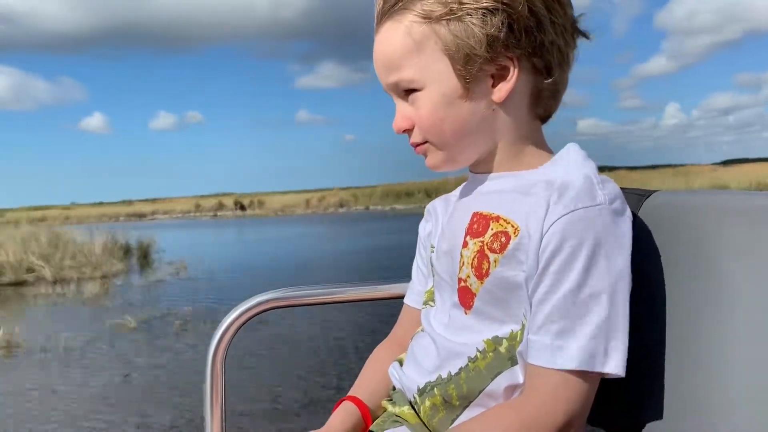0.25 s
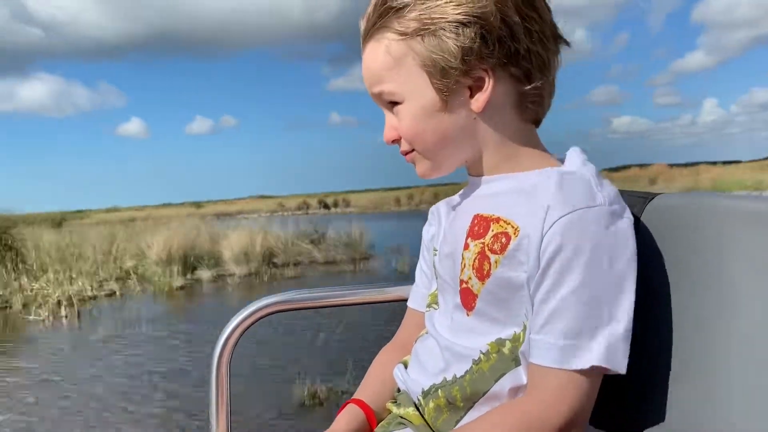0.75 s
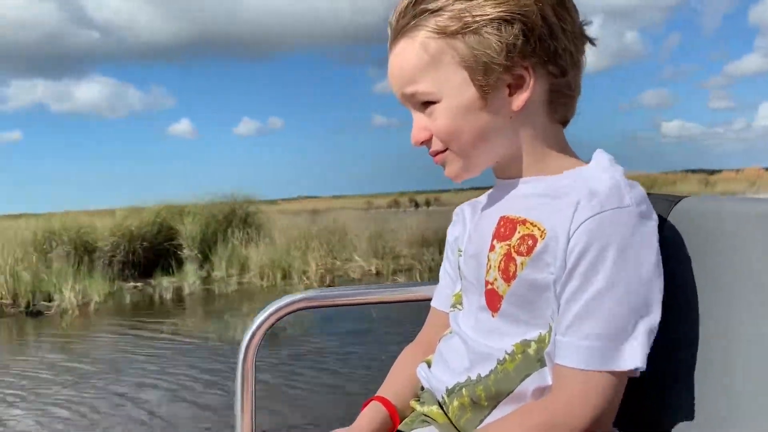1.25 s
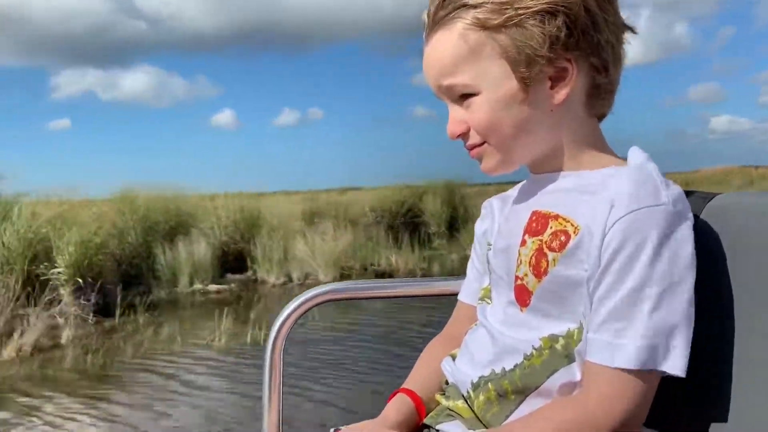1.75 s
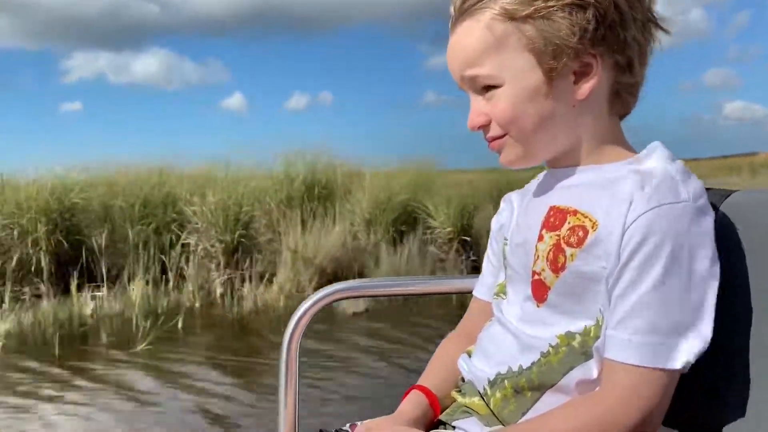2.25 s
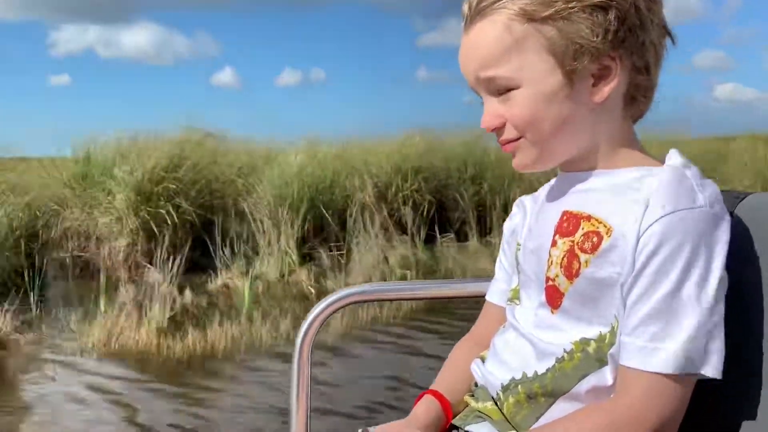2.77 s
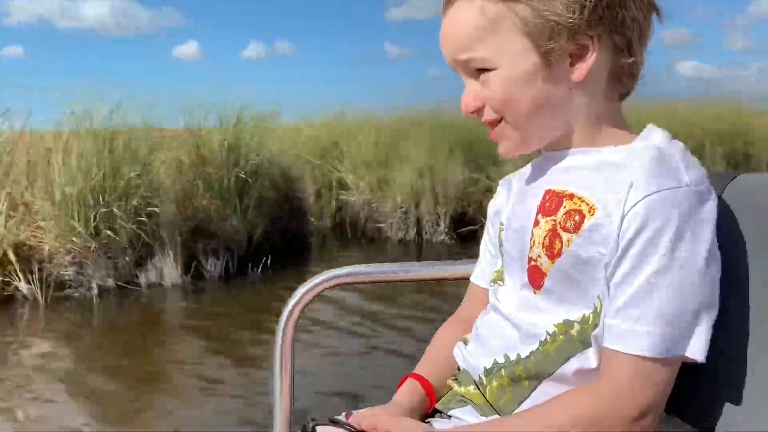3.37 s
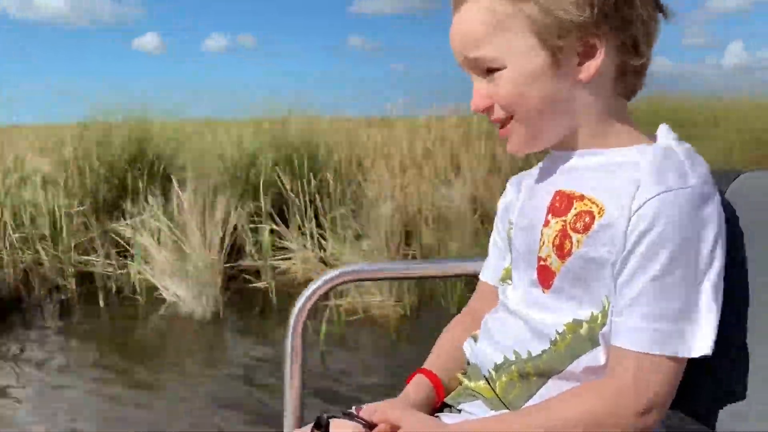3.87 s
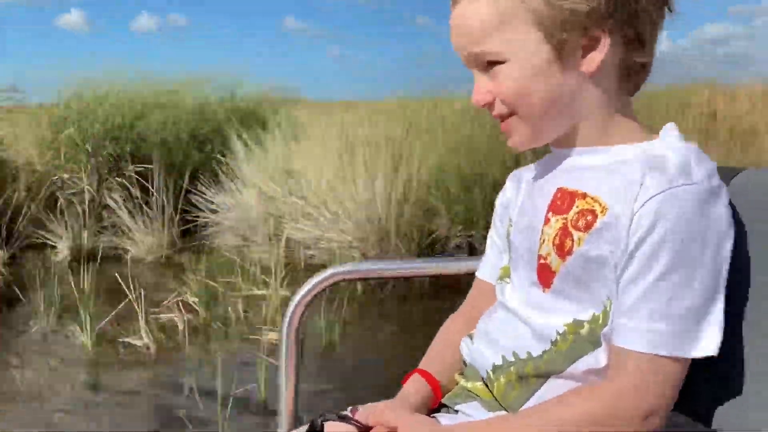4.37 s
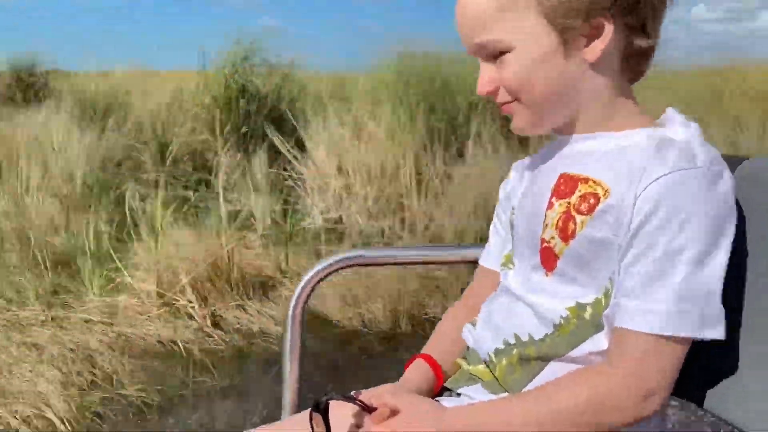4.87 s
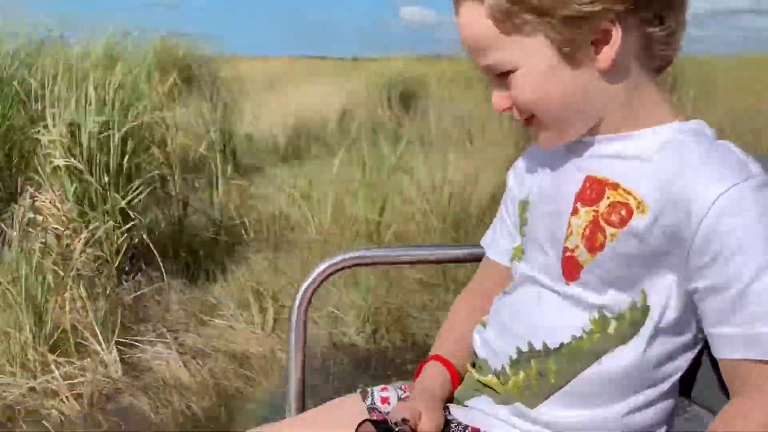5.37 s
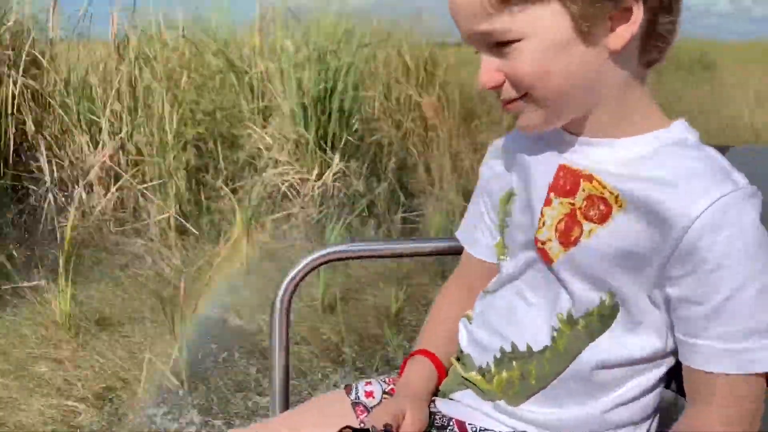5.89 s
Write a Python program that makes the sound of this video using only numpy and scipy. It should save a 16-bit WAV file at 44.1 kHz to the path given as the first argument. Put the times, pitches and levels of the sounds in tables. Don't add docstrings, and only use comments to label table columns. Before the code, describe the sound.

A close stereo pair at the seats of an airboat on open marsh hears an unbroken loud drone from start to finish. Just behind, the propeller holds a deep pair of tones near 92 and 185 Hz, with weaker, fluttering overtones. Engine exhaust adds rough low tones that beat with the blades, and a very thin gear whine lies underneath. Broadband wash, fine hiss and low wind rumble fill the rest. Pitch creeps up until about 1.8 s, then slowly sinks slightly to the end at 6.1 s. Wind gusts swell around 0.5, 1.35, 2.3, 4.8 and 5.8 s. The guard hums in brief bursts, stronger near 3.65, 5.84 and 6.06 s. Overtone colour shifts through the bend until about 4.2 s. Nearby reeds thicken the wash around 1.6 s and after 5 s, with slightly more hiss at the end and a tiny whine jump near 6.07 s.

```python
import sys
import numpy as np
from scipy import signal
from scipy.fft import rfft, irfft
from scipy.io import wavfile

SR = 44100
rng = np.random.default_rng(int(sys.argv[2]) if len(sys.argv) > 2 else 0)


def transcribe(signal):
    frames = np.atleast_2d(signal).T
    limited = np.clip(frames, -1, 1)
    pcm = np.round(limited * 32767).astype(np.int16)
    wavfile.write(sys.argv[1], SR, pcm)


def nominal_scale(level):
    x = np.asarray(level, float) / 20
    return 10 ** x


N = 270333

# (time [s], blade passes [per s])
SPEED = [
    (0.0, 92.3),
    (0.6, 92.58),
    (1.8, 93.0),
    (3.0, 92.75),
    (4.2, 92.12),
    (5.0, 91.64),
    (6.13, 90.62),
]


def blade_passes():
    return np.cumsum(in_time(SPEED)[0]) / SR


# (multiple [1], level [dB], left over right [dB], left lead [rad], steady share [0-1])
BLADES = [(1, -20.9, -1.5, -0.3, 1.0), (2, -22.2, 0.4, -0.1, 0.98), (3, -41.8, -4.4, 0.6, 0.65),
          (4, -43.3, -5.2, -1.4, 0.6), (5, -43.2, 1.4, 2.4, 0.65), (6, -46.2, 6.2, -2.9, 0.6),
          (7, -54.5, 2.7, 0.9, 0.38), (8, -49.6, -1.8, -1.5, 0.7), (9, -52.3, 2.9, -1.0, 0.54),
          (10, -51.4, 0.4, -2.5, 0.6), (11, -53.0, 3.2, -2.9, 0.55), (12, -58.8, -5.1, -1.5, 0.34),
          (13, -54.3, -0.3, -2.4, 0.66), (14, -56.5, 0.7, 3.0, 0.36), (15, -59.0, -0.5, -3.1, 0.2),
          (16, -61.4, -0.1, 2.7, 0.23), (17, -61.0, -0.1, 1.5, 0.45)]
# (time [s], share of the swing [0-1])
HEADING = [
    (0, 0.14),
    (2.4, 0.45),
    (4.2, 0.98),
    (5.3, .95),
    (6.13, 0.8),
]
# (multiple [1], change over the whole swing [dB])
LOBES = [
    (3, -9.0),
    (5, 6.0),
    (7, 8.0),
    (8, -5.0),
    (13, -4.0),
]


def propeller(passes, reeds, load_db):
    passes = passes + 0.0026 * drift(4.6)
    swing = in_time(HEADING)[0] - 0.5
    eddy = nominal_scale(1.3 * drift(7.5))
    lowest_db = [0.54 - 1.7 * reeds, load_db]
    low_db = -1.6 - 1.8 * load_db
    high_db = -1.1 + 1.5 * reeds - 0.97 * load_db
    lobes = dict(LOBES)
    out = 0
    for k, level_db, lean_db, lead, steady in BLADES:
        skew = -1.8 if k < 7 else 1.15
        turns = k * passes + skew * (k - 1) / (2 * np.pi)
        if k < 3:
            flutter_db = lowest_db[int(k) - 1] + 0.25 * drift(6.0)
            out = out + partial(turns, level_db + flutter_db, lean_db, lead, steady=1, waver_hz=1)
            continue
        line = partial(turns, level_db, lean_db, lead, np.sqrt(steady), waver_hz=0.65 + 0.16 * k)
        hump_db = level_db - 5.5 + 0.67 * min(k, 11)
        hump = partial(turns, hump_db, lean_db, lead, steady=0, waver_hz=9.2 + 1.0 * k)
        lift_db = (low_db if k < 7 else high_db) + lobes.get(k, 0) * swing + 2.0 * drift(2.5)
        out = out + nominal_scale(lift_db) * (line + eddy * hump)
    return out


def crank_turns(passes):
    return 0.76383 * passes + 1.082


# (crank order [1], level [dB], left over right [dB], left lead [rad])
EXHAUST = [(1.0, -38.5, -0.1, -0.2), (1.5, -36.7, -0.8, -0.4), (2.0, -51.5, 1.1, -0.2),
           (2.5, -35.5, 0.8, -0.4), (3.0, -48.4, 1.8, -0.4), (3.5, -45.2, 2.9, -0.2),
           (4.0, -45.1, 4.1, -0.7), (4.5, -50.1, -2.4, -1.8), (5.0, -45.1, -0.7, -2.9),
           (5.5, -50.7, 4.2, -1.0), (8.0, -53.1, -0.2, 0.6), (11.0, -60.5, -0.5, 0.3),
           (12.0, -58.0, -2.2, -1.4), (15.5, -58.8, 0.8, -2.2)]


def exhaust(crank):
    out = 0
    for order, level_db, lean_db, lead in EXHAUST:
        turns = order * crank + 0.013 * drift(12.0)
        steady = 1 - 0.0069 * order ** 2
        tone = partial(turns, level_db, lean_db, lead, steady, waver_hz=2.5)
        out = out + nominal_scale(0.93 * drift(4.4)) * tone
    return out


# (time [s], lift [dB], half length [s])
WHINE_JOLT = [
    (6.07, 10, 0.032),
]


def gear_whine(crank, load_db):
    warming_db = 1.2 * np.arange(N) / SR
    level_db = -69.5 + 2.5 * load_db + warming_db + bumps(WHINE_JOLT)
    teeth = 48
    return partial(teeth * crank, level_db, lean_db=2.5, lead=0.1, steady=0.9, waver_hz=3)


# (time [s], lift [dB])
CAGE_BURSTS = [
    (0.33, 5),
    (1.25, 3),
    (2.17, 6),
    (3.65, 7.5),
    (5.07, 6),
    (5.61, 2),
    (5.84, 7),
    (6.06, 9.5),
]


def cage(chop):
    pitch_hz, width_hz = 998, 140
    r = np.exp(-np.pi * width_hz / SR)
    poles = [1, -2 * r * np.cos(2 * np.pi * pitch_hz / SR), r * r]
    ring = rng.standard_normal((3, N))
    for _ in range(2):
        ring = signal.lfilter([1, 0, -1], poles, ring)
    hum = rms_one(ring[0] + 0.37 * ring[1:])
    burst_db = bumps([(s, db, 0.028) for s, db in CAGE_BURSTS])
    return hum * nominal_scale(-52 + burst_db + 2.8 * drift(15.0) + 6.5 * chop)


# (frequency [Hz], level per Hz [dB], left over right [dB], likeness [0-1])
WASH = [(152, 1, -5.5, 0.5), (288, -2.5, 8.5, 0.26), (460, -2.5, -0.5, 0.2), (656, -7.5, 0.5, 0.27),
        (1010, -10, -7, 0.19), (1250, -10, 3, 0.5), (1940, -9.5, -1, 0.49), (2920, -19.5, 4, 0.56),
        (4260, -24.5, 8, 0.23), (5470, -29, 4.5, 0.6), (7000, -38, 3, .2), (9800, -42, -14, .2)]


def propeller_wash(chop, reeds):
    air = air_noise(WASH, lag_s=11.8 / SR, turn=0.01, patchy_db=0.5, count=12)
    return air * nominal_scale(-38 + 1.05 * reeds + 0.4 * chop)


# (frequency [Hz], level per Hz [dB], left over right [dB], likeness [0-1])
HISS = [(3020, -1, -7, 1), (5470, -2, -2.5, 0.14), (7400, -0.5, 0, 0.54), (8900, -1, -2, .85),
        (11000, -2.5, 1, 0.84), (13000, -4, -1, 1), (14400, -1.5, 1.5, .6), (15940, -9, -2.5, .6)]


def slipstream_hiss(chop, reeds):
    air = air_noise(HISS, lag_s=11.15 / SR, turn=-2.1, patchy_db=0.3, count=5)
    return air * nominal_scale(-51.5 + 2.3 * reeds ** 3 + 0.2 * chop)


# (frequency [Hz], level per Hz [dB], left over right [dB], likeness [0-1])
RUMBLE = [(20, -24, 3, 1), (31.8, -3.5, 4, 0.7), (64.6, 3, -0.5, 1), (103, .5, 3, 0.97), (208, 0, -2, 1),
          (256, -1, -8.5, 0.56), (330, -8.5, -3, 0.28), (474, -34.5, -2.5, 1)]
# (time [s], lift [dB], half length [s])
GUSTS = [
    (.5, 5, .2),
    (1.35, 4, .15),
    (2.3, 6.5, .35),
    (4.8, 3.5, 0.26),
    (5.8, 6, 0.49),
]


def wind_rumble():
    air = air_noise(RUMBLE, lag_s=0.000084, turn=0.072, patchy_db=1.4, count=6)
    return air * nominal_scale(-38.5 + bumps(GUSTS))


def air_noise(rows, lag_s, turn, patchy_db, count):
    hz = np.maximum(np.arange(N // 2 + 1) * SR / N, 1)
    at, *columns = np.transpose(rows)
    level_db, lean_db, alike = [np.interp(np.log(hz), np.log(at), c) for c in columns]
    alike = np.clip(alike, 0, 1)
    shared, left, right = rfft(rng.standard_normal((3, N)))
    late = np.exp(-1j * (2 * np.pi * hz * lag_s + turn))
    common = shared * np.array([late, np.ones_like(late)])
    pair = np.sqrt(alike) * common + np.sqrt(1 - alike) * np.array([left, right])
    pair = pair * nominal_scale(level_db + np.outer([0.5, -0.5], lean_db))
    pair = pair * (hz > at[0]) * (hz < at[-1])
    place = np.interp(np.log(hz), np.log(at[[0, -1]]), [0, count - 1])
    together = drift(8.1)
    out = 0
    for k in range(count):
        band = np.clip(1 - np.abs(place - k), 0, 1)
        flicker_db = patchy_db * (0.81 * together + drift(11.0))
        out = out + irfft(pair * band, N) * nominal_scale(flicker_db)
    return rms_one(out)


def partial(turns, level_db, lean_db, lead, steady, waver_hz, alike=0.3):
    steady = np.clip(steady, 0, 1)
    scatter = 1 - steady ** 2
    both, *own = [(drift(waver_hz) + 1j * drift(waver_hz)) / np.sqrt(2) for _ in range(3)]
    shared = steady + np.sqrt(scatter * alike) * both
    spin = np.exp(2j * np.pi * turns)
    out = []
    for side, apart in zip((0.5, -0.5), own):
        shape = shared * np.exp(1j * side * lead) + np.sqrt(scatter * (1 - alike)) * apart
        out.append(np.sqrt(2) * nominal_scale(level_db + side * lean_db) * np.real(shape * spin))
    return np.array(out)


def drift(rate_hz):
    r = np.exp(-64 * np.pi * rate_hz / SR)
    noise = rng.standard_normal(N // 32 + 2002)
    slow = signal.lfilter([1], [1, -2 * r, r * r], noise)[2000:]
    return np.interp(np.arange(N) / 32, np.arange(len(slow)), rms_one(slow))


def bumps(rows):
    t = np.arange(N) / SR
    return sum(db * np.exp(-0.5 * ((t - s) / half) ** 2) for s, db, half in rows)


def in_time(rows):
    s, *columns = np.transpose(rows)
    return [np.interp(np.arange(N) / SR, s, c) for c in columns]


def rms_one(x):
    return x / np.sqrt(np.mean(np.abs(x) ** 2) + 1e-20)


# (time [s], nearness [0-1])
REEDS = [
    (0, 0),
    (.9, 0),
    (1.6, 0.8),
    (2.75, 0.4),
    (3.05, 0.3),
    (4.1, 0),
    (4.8, 0.3),
    (5.25, 0.8),
    (5.6, 0.8),
    (6.13, 1.0),
]
# (time [s], load [dB])
LOAD = [
    (0, 1.1),
    (.6, -0.1),
    (1.35, -.8),
    (1.75, 0.2),
    (2.75, 0.7),
    (4.1, .6),
    (4.6, -.2),
    (5.35, 0.6),
    (5.8, -1.5),
    (6.13, -0.5),
]


def scene():
    reeds, load_db = in_time(REEDS)[0], in_time(LOAD)[0]
    passes = blade_passes()
    crank = crank_turns(passes)
    chop = np.cos(2 * np.pi * (passes - 0.78))
    machine = propeller(passes, reeds, load_db) + exhaust(crank) + gear_whine(crank, load_db) + cage(chop)
    air = propeller_wash(chop, reeds) + slipstream_hiss(chop, reeds) + wind_rumble()
    return machine + air


def low_pass(x):
    return signal.sosfilt(signal.butter(12, 15750, fs=SR, output="sos"), x)


def record(dry):
    return low_pass(dry)


dry = scene()
out = record(dry)
transcribe(out)
```